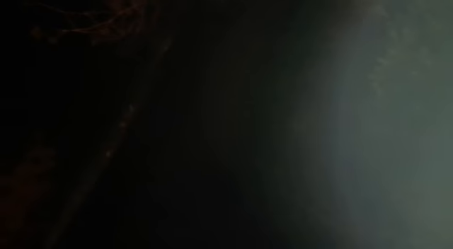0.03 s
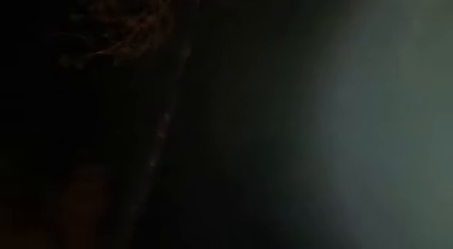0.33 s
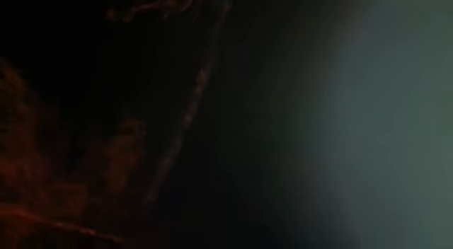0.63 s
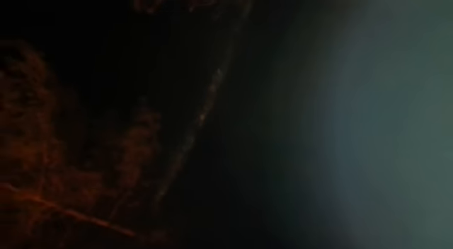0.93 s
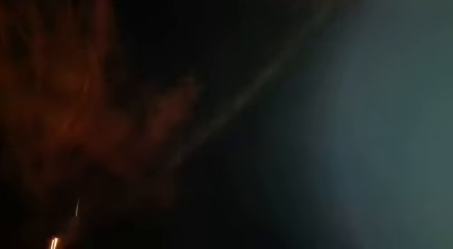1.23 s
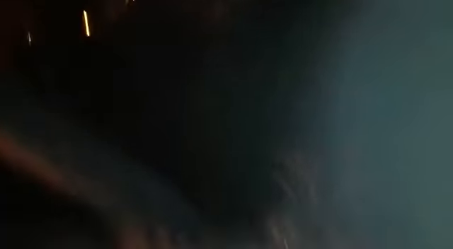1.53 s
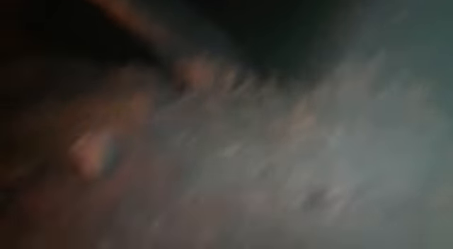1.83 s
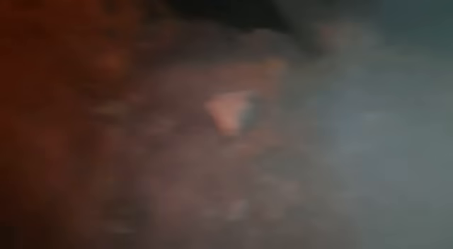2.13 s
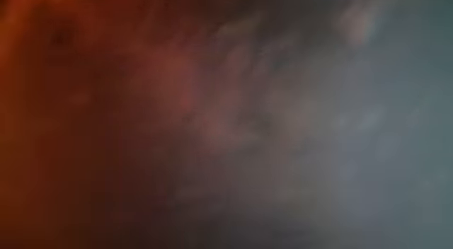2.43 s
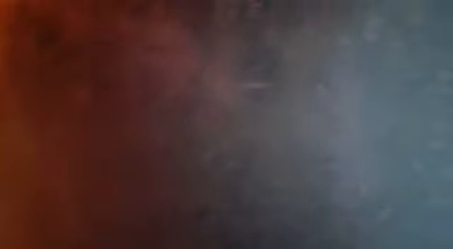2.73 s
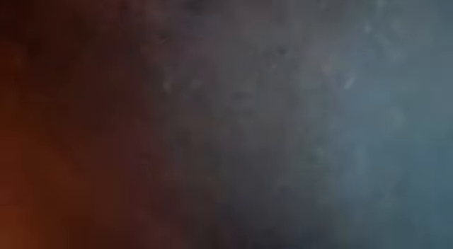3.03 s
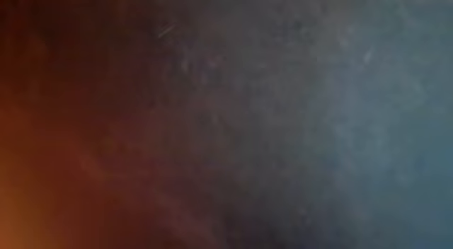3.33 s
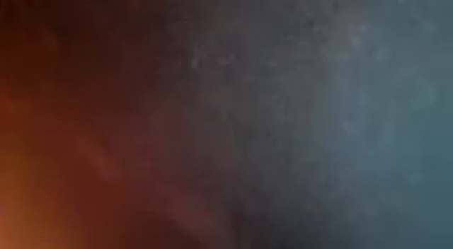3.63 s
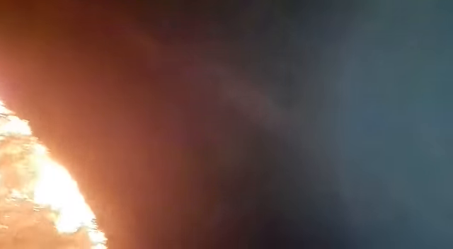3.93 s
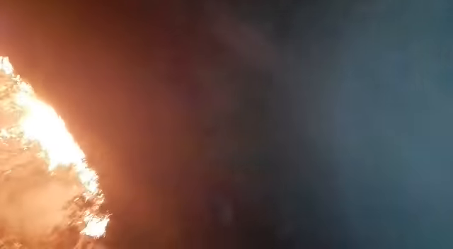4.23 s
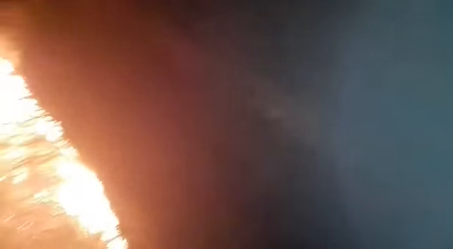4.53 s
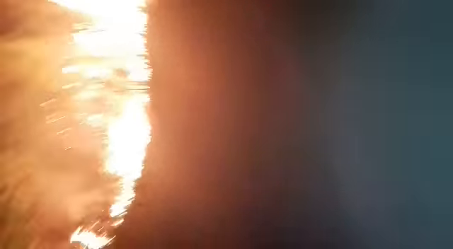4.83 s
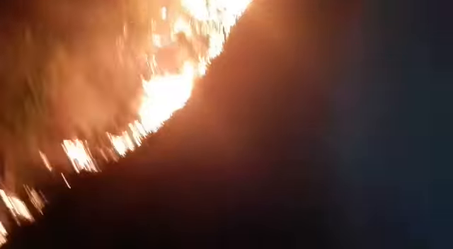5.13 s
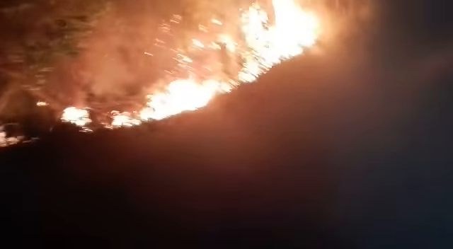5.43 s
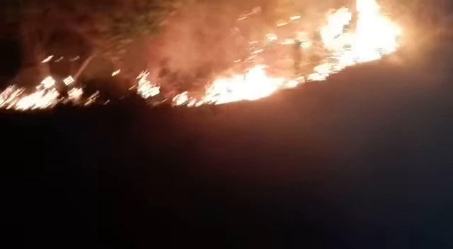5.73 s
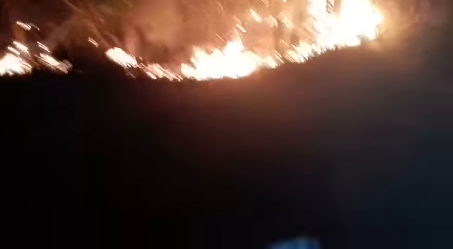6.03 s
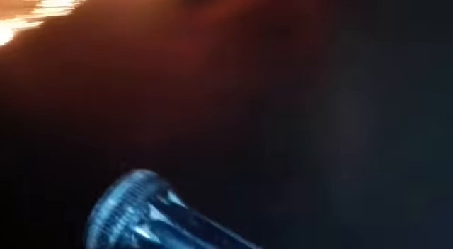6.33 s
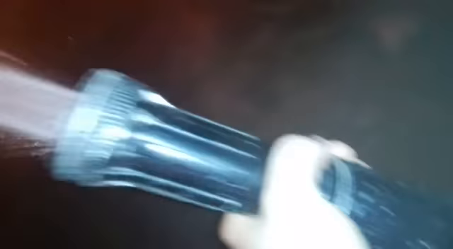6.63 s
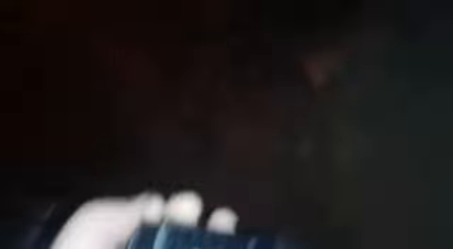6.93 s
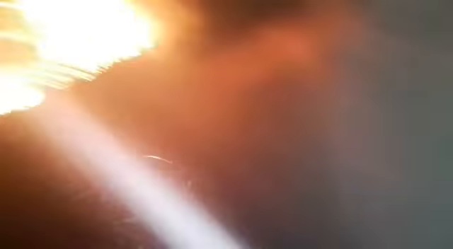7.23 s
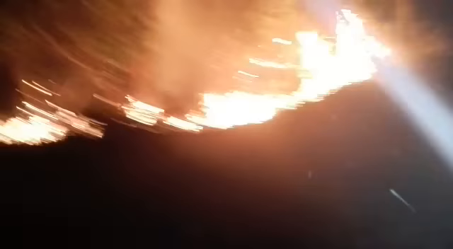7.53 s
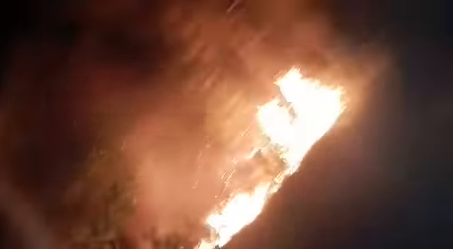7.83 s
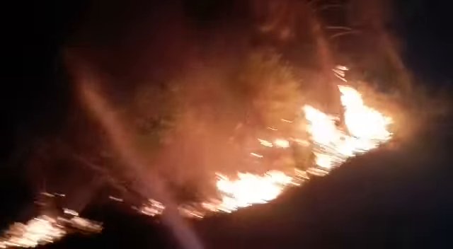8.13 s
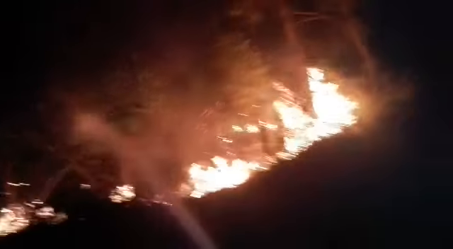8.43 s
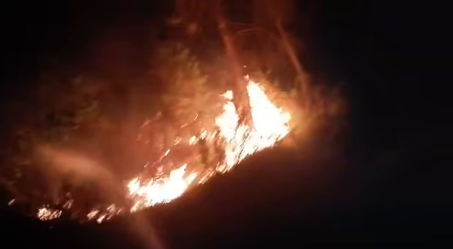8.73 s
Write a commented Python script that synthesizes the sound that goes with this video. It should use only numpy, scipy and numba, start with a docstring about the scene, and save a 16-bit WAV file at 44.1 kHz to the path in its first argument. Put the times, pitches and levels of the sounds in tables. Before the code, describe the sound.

Outdoors at a brush fire, a shut hose nozzle leaks a fine, spitting spray close to a wet phone. Drops tick and pop on the microphone, water patters on the ground, fingers rub the case and a few burning twigs snap. Then the nozzle opens with a loud, hissing burst of air and water that buffets the microphone and settles into a softer, solid stream. A distant pump engine throbs faintly throughout.

```python
"""A fire hose at a brush fire, heard from a wet phone beside the nozzle, with the pump engine throbbing behind.
At first the shut nozzle leaks a fine, spitting spray. Drops tick on the phone and pop on its two
microphone holes (the "ports"), fingers rub the case and burning twigs snap.
Then the nozzle opens: air and water burst out, beat on the ports, swing from the right to the front
and settle into a softer, solid stream."""
import sys
import numpy as np
from scipy import signal
from scipy.fft import rfft, irfft
from scipy.io import wavfile
from scipy.ndimage import uniform_filter1d, map_coordinates
from numba import njit

SR = 44100
rng = np.random.default_rng(int(sys.argv[2]) if len(sys.argv) > 2 else 0)


def waveform_to_disk(signal):
    """Save audio, clipped to [-1, 1], as 16-bit WAV at the path in sys.argv[1]."""
    frames = np.transpose(np.atleast_2d(signal))
    scaled = np.clip(frames, -1, 1) * 32767
    samples = np.round(scaled).astype(np.int16)
    wavfile.write(sys.argv[1], SR, samples)


N = 391608
TIME = np.arange(N) / SR
FREQS = np.fft.rfftfreq(N, 1 / SR)
OPEN_S, OPEN_TIME_S = 6.677, 0.016  # the valve cracks open
FULL_S, PULL_TIME_S = 6.83, 0.042  # it is pulled fully open

# "Pan" always means left level minus right level, so a positive pan lies to the left.
# The leak as the phone moves around it: t/s, spray level/dB, spray pan/dB, patter level/dB
LEAK_LEVELS = [(0, -28.3, -6.5, -38.5), (1.35, -27.4, -6, -39.5), (1.65, -26.5, -5.5, -42.5),
               (2.3, -24, -4.5, -40), (2.85, -26, -6, -39.5), (3.75, -26.5, -7.5, -41.5),
               (4.05, -26.5, -6, -48), (4.3, -27.5, -7, -49), (4.7, -25.5, -4, -36),
               (6.05, -25.5, -2, -34.5), (6.3, -26.5, -4, -34.5), (6.68, -26, -8.5, -36)]
# Sound from the ground: t/s, lowest pitch the echo weakens/Hz, echo gain/0-1, distant patter share/0-1
GROUND_ECHO = [(0, 344, 0.37, 0.77), (1.3, 343, 0.38, 1), (1.65, 312, 0.44, 0.3), (2.4, 467, 0.1, 0.26),
               (3.0, 450, 0.12, 0.18), (4.7, 507, 0.28, 0), (5.1, 390, 0.2, 0.09), (5.85, 496, 0.3, 0),
               (6.25, 640, 0.5, .1), (6.6, 716, 0.4, 0.1)]


def undb(db):
    """Turn decibels into a gain to multiply by."""
    return 10 ** (np.asarray(db) / 20)


def unit(x):
    """Scale each channel to an average (rms) level of 1."""
    return x / np.sqrt(np.mean(x ** 2, axis=-1, keepdims=True))


def stereo(db, pan_db):
    """Left and right gains for a level and a pan."""
    pair = undb(np.outer([1, -1], pan_db) / 2)
    return undb(db) * pair / np.sqrt(np.mean(pair ** 2, axis=0))


def curves(table):
    """Join the points of each column with straight lines in time."""
    times, *columns = np.transpose(table)
    return [np.interp(TIME, times, column) for column in columns]


def ramp(middle_s, length_s):
    """A straight rise from 0 to 1."""
    return np.clip((TIME - middle_s) / length_s + 0.5, 0, 1)


def swell(middle_s, length_s):
    """A rounded rise from 0 to 1 and back."""
    return np.cos(np.pi * np.clip((TIME - middle_s) / length_s, -0.5, 0.5))


def wander(rate_hz):
    """A smooth random curve of typical size 1 that heads for a new value rate_hz times a second."""
    hold = max(int(SR / rate_hz), 2)
    steps = np.repeat(rng.standard_normal(N // hold + 1), hold)[:N]
    return unit(uniform_filter1d(uniform_filter1d(steps, hold), hold))


def noise():
    """A separate white noise for each port."""
    return rng.standard_normal((2, N))


def colour(x, table):
    """Shape the tone with a table of f/Hz and gain/dB (one gain column, or one for each port)."""
    hz, *columns = np.transpose(table)
    db = np.array([np.interp(np.log(FREQS + 1), np.log(hz), column) for column in columns])
    return irfft(rfft(x) * undb(db), N)


def low_cut(x, hz):
    """Weaken everything below hz."""
    return signal.sosfilt(signal.butter(2, hz, "high", fs=SR, output="sos"), x)


@njit
def resonate(x, hz, width_hz):
    """A ringing filter (state-variable band-pass) whose pitch can change at every sample."""
    out, band_state, low_state = np.empty(len(x)), 0.0, 0.0
    for i in range(len(x)):
        tuning, damping = np.tan(np.pi * hz[i] / SR), width_hz / hz[i]
        ring = (band_state + tuning * (x[i] - low_state)) / (1 + tuning * (tuning + damping))
        band_state = 2 * ring - band_state
        low_state += 2 * tuning * ring
        out[i] = damping * ring
    return out


def band(x, hz, width_hz, passes=2):
    """Keep the sound near a steady or moving pitch; more passes give steeper edges."""
    centre_hz = hz * np.ones(x.shape[-1])
    for _ in range(passes):
        x = np.apply_along_axis(resonate, -1, x, centre_hz, float(width_hz))
    return x


def flutter(x, depth_db, rate_hz, bands=16):
    """Let overlapping pitch bands swell and sink on their own, as they do in a swirling flow."""
    position = np.sqrt(FREQS / FREQS[-1]) * (bands - 1)
    spectrum, out = rfft(x), 0
    for k in range(bands):
        part = irfft(spectrum * np.maximum(1 - np.abs(position - k), 0), N)
        out = out + part * undb(depth_db * wander(rate_hz))
    return out


def grains(per_s, spread_db, decay_s, floor):
    """Loudness curve of many tiny hits, such as drops: uneven, quick to fade, over an even floor."""
    hits = rng.random(N) < per_s / SR
    size = undb(spread_db * np.minimum(rng.standard_normal(N), 2.5))
    power = signal.lfilter([1], [1, -np.exp(-1 / (decay_s * SR))], hits * size ** 2)
    return unit(np.sqrt(power / power.mean() + floor))


def strikes(table, shape):
    """Place a fresh pulse for each row of t/s, peak/dB, pan/dB; any further columns go to shape."""
    out, t = np.zeros((2, N + SR)), np.arange(SR // 20) / SR
    for start_s, db, pan_db, *more in table:
        pulse, start = shape(t, *more), int(start_s * SR)
        pulse = pulse / np.abs(pulse).max(axis=-1, keepdims=True)
        out[:, start:start + len(t)] += stereo(db, pan_db) * pulse
    return out[:, :N]


def water_noise(shared, top_hz):
    """Noise whose shared part, fading above top_hz, comes straight from the water to one port first."""
    # Direction of the water as the phone turns: t/s, delay of the left port behind the right/ms
    bearing = [(0, .15), (1, .16), (1.5, .32), (1.9, .4), (2.3, .37), (2.7, .24), (3.2, .24), (4.5, .17),
               (5.1, .02), (5.7, -.02), (6.1, .03), (6.5, .22), (7.05, .36), (7.25, .27), (7.45, -.12),
               (7.62, -.25), (7.9, 0), (8.15, -.11), (8.88, -.13)]
    lag_ms, = curves(bearing)
    right = rng.standard_normal(N)
    left = map_coordinates(right, [(TIME - lag_ms / 1000) * SR], mode="mirror")
    share = shared / (1 + (FREQS / top_hz) ** 4)
    return irfft(np.sqrt(share) * rfft(np.array([left, right])) + np.sqrt(1 - share) * rfft(noise()), N)


def off_ground(x, echo, notch_hz):
    """Add the echo off the ground, which arrives half a cycle late at notch_hz and weakens that pitch."""
    delay_s = 0.5 / notch_hz
    return x + echo * np.array([np.interp(TIME - delay_s, TIME, channel) for channel in x])


def pump_engine():
    """The pump runs steadily far off: only its low tones and a rumble arrive, wavering in the air."""
    # Engine tones: multiple of the four-stroke cycle rate, relative level/dB
    engine_tones = [(1, -33), (2, -29), (3, -21), (4, -3), (5, 1.5), (6, -3.5), (7, -9.5), (8, -1),
                    (9, -11), (10, -20), (11, -20), (12, -25), (13, -25), (14, -16.5)]
    # Engine rumble and outdoor air: f/Hz, gain/dB
    rumble_colour = [(20, -29), (35, -16), (60, -6), (100, -2), (150, -9), (240, -12.5), (340, -12),
                     (480, -15.5), (3000, -30.5)]
    cycle_hz, waver_db = 15.5, 1.5
    phase = 2 * np.pi * np.cumsum(cycle_hz * (1 + 0.0024 * wander(2.746))) / SR
    throb = sum(undb(db + waver_db * wander(8.5)) * np.sin(multiple * phase + 2 * np.pi * rng.random())
                for multiple, db in engine_tones)
    notch_hz, echo, _ = curves(GROUND_ECHO)
    air = off_ground(rng.standard_normal(N) + 0.5 * noise(), echo, notch_hz)
    return undb(-41.5) * unit(throb) + undb(-43) * unit(colour(air, rumble_colour))


def twig_snaps():
    """Burning twigs crack, each at its own pitch, far enough off that both ports get the same shape."""
    # Twigs breaking: t/s, peak/dB, pan/dB
    snaps = [(5.497, -22, 5), (5.7962, -22, 6), (5.8088, -14.5, 7), (6.1796, -24, 6), (6.2872, -18, 5)]

    def snap(t):
        hz = 2800 * np.exp(rng.uniform(-0.25, 0.25))
        crack = rng.standard_normal(len(t)) * np.exp(-t / 0.0013)
        return low_cut(band(crack, hz, width_hz=2400, passes=1), 1800)
    return strikes(snaps, snap)


def hand_bumps():
    """The hand knocks softly on the phone; each thud dies within about two cycles."""
    # Dull knocks: t/s, peak/dB, pan/dB
    bumps = [(0.096, -23, 8), (0.126, -23.5, 3), (0.152, -23, 18), (0.183, -19.5, 20), (0.385, -20, 20),
             (0.409, -29, 10), (0.424, -25, 15), (1.408, -27, 20)]

    def bump(t):
        hz = 115 * np.exp(0.18 * rng.standard_normal())
        return np.sin(2 * np.pi * hz * t) * t * np.exp(-t / 0.003)
    return strikes(bumps, bump)


def finger_clicks():
    """A fingertip sticks beside the left port and lets go with a muffled click."""
    # Skin letting go of the case: t/s, peak/dB, pan/dB
    clicks = [(4.8438, -20, 23), (4.8572, -19.5, 21), (4.901, -20, 20), (4.9044, -18.5, 20),
              (4.9123, -20, 22), (4.9193, -22.5, 20)]

    def click(t):
        hz = 620 * np.exp(rng.uniform(-0.2, 0.2))
        ring = np.cos(2 * np.pi * hz * t) * np.exp(-t / 0.0007)
        return signal.sosfilt(signal.butter(4, 1500, fs=SR, output="sos"), ring)
    return strikes(clicks, click)


def finger_rubs():
    """Fingers rub the phone and the valve handle: short swells of tiny slips around one broad pitch."""
    # Rubs: middle t/s, length/s, level/dB, centre f/Hz, width/Hz, pan/dB
    rubs = [(0.157, 0.44, -36.5, 135, 49.7, 25), (0.488, 0.28, -38.5, 102, 39.5, 17),
            (4.722, 0.12, -42.5, 1060, 500, 22), (4.904, 0.03, -30, 200, 70, 14),
            (4.91, 0.1, -37, 650, 400, 25), (4.96, 0.07, -38, 1160, 350, 18),
            (6.655, 0.099, -35, 1440, 830, 14)]
    out, slips = 0, grains(per_s=780, spread_db=2, decay_s=0.0013, floor=0.56)
    for middle_s, length_s, db, hz, width_hz, pan_db in rubs:
        scrape = band(rng.standard_normal(N) * slips, hz, 2 * width_hz)
        out = out + unit(scrape) * swell(middle_s, length_s) * stereo(db, pan_db)
    return out


def case_ticks():
    """Large drops ring the phone's case for an instant and shatter in a short, bright crack."""
    # Drops on the case: t/s, peak/dB, pan/dB, f/Hz
    ticks = [(0.381, -13, -8, 8400), (0.386, -13, -4, 7200), (0.4472, -13, -13, 8400),
             (0.5117, -13, -11, 7200), (0.5526, -11.5, -13, 8400), (0.6681, -12, -8, 8000),
             (1.0234, -15, -10, 7300), (1.1116, -12.5, -10, 8000), (1.1171, -10, -13, 8500),
             (1.1698, -12, -10, 7300), (1.1939, -11, -11, 8200), (1.2893, -12, -9, 8300),
             (1.3868, -9, -14, 8200), (1.6021, -10, -9, 8500), (1.7005, -10, -15, 8200),
             (1.7876, -6.5, -10, 7800), (1.9424, -11.5, -6, 7500), (1.948, -11, -5, 7500),
             (2.0651, -11, 0, 8000), (2.112, -9.5, -6, 8400), (2.1964, -4, -4, 8200),
             (2.2059, -7, -5, 7900), (2.2309, -10, -7, 8000), (2.2427, -7, -4, 7700),
             (2.2925, -8, -7, 7700), (2.4159, -8, -9, 7800), (2.5969, -6, -10, 7700),
             (2.6206, -4.5, -6, 7100), (2.6322, -6.5, -10, 8200), (2.6668, -12, -8, 8300),
             (2.6715, -9, -5, 9300), (2.7122, -13, -1, 6900), (2.7194, -9.5, -4, 7000),
             (2.9024, -8.5, -10, 8400), (3.0314, -12, -10, 7100), (3.0443, -10, -9, 6900),
             (3.1672, -11, -10, 7600), (3.1966, -8.5, -7, 7600), (3.206, -8.5, -15, 9400),
             (3.4324, -11, -10, 7500), (4.0103, -8, 0, 7300), (4.0857, -9.5, -8, 7200),
             (4.2652, -9, -10, 9200), (4.6297, -8, -13, 8300), (4.7414, -8, -3, 8300),
             (4.9511, -11, -1, 7100), (4.9651, -6.5, -5, 7100), (5.1215, -8, -7, 7100),
             (5.1849, -9, -5, 7500), (5.2336, -5.5, -8, 7800), (5.5047, -11, 1, 7300),
             (5.6023, -7.5, -3, 7000), (5.7068, -7, -1, 9000), (5.9224, -11, -4, 7600),
             (6.0046, -10.5, -6, 8500), (6.0475, -10.5, -5, 7400), (6.0813, -7, -2, 7900),
             (6.6567, -7, -14, 8200)]

    def tick(t, hz):
        shatter = rng.standard_normal((2, len(t))) * np.exp(-t / 0.0009)
        crack = band(shatter, hz, width_hz=7500, passes=1)
        ring = np.cos(2 * np.pi * hz * t) * np.exp(-t / 0.0002)
        return low_cut(crack + 1.2 * ring, 3800)
    return strikes(ticks, tick)


def port_pops():
    """A drop on the right port gives the air inside one sharp push and leaves a faint splash."""
    # Drops on the port: t/s, peak/dB, pan/dB
    pops = [(0.698, -23, -18), (0.7206, -10.5, -22), (0.7324, -18, -15), (0.8404, -13.5, -16),
            (2.0648, -20, -12), (2.3608, -19, -12), (2.4156, -12, -22), (2.4487, -18, -15),
            (4.0101, -19, -11), (4.0556, -15, -15)]

    def pop(t):
        push = np.cos(2 * np.pi * 450 * t) * np.exp(-t / 0.00019)
        splash = rng.standard_normal(len(t)) * np.exp(-t / 0.004)
        return push + 0.05 * band(splash, hz=2000, width_hz=4000, passes=1)
    return strikes(pops, pop)


def ground_patter():
    """The leaked water lands on the ground: separate splashes nearby, a duller wash farther off."""
    # Water landing nearby: f/Hz, gain/dB
    near_colour = [(100, -43), (300, -2.5), (700, -5), (1400, -40), (2300, 1.5), (4000, 2.5), (7000, -1),
                   (14000, -6)]
    # Water landing far off: f/Hz, gain/dB
    far_colour = [(100, -22), (300, -27), (680, -1), (1000, 5), (1350, 4), (2200, 0.5), (2900, -15),
                  (8000, -31)]
    notch_hz, echo, far_share = curves(GROUND_ECHO)
    _, _, db = curves(LEAK_LEVELS)
    splashes = water_noise(shared=0.41, top_hz=7000)
    splashes *= grains(per_s=910, spread_db=9.5, decay_s=0.0039, floor=0.47)
    near = np.sqrt(1 - far_share) * unit(colour(splashes, near_colour))
    far = np.sqrt(far_share) * unit(colour(noise() + rng.standard_normal(N), far_colour))
    patter = off_ground(near + 0.48 * far, echo, notch_hz)
    return unit(flutter(patter, depth_db=1.5, rate_hz=14)) * stereo(db, pan_db=2.7)


def wet_port(spray, shower):
    """A water film shifts the left port's ring as the phone tilts, and dulls the octave above it."""
    # Ring of the wet port: t/s, f/Hz, level/dB
    port_ring = [(0, 4530, -38), (1.3, 4230, -43.5), (1.7, 6100, -42), (2.3, 6200, -36.5), (2.9, 5500, -45),
                 (3.4, 5300, -35.5), (4.6, 4960, -36), (5.2, 7040, -47), (6.7, 5500, -58)]
    hz, db = curves(port_ring)
    hz = hz * np.exp(0.055 * wander(25))
    wetting = grains(per_s=520, spread_db=6, decay_s=0.00067, floor=1.5)
    ring = band(shower * wetting, hz, width_hz=0.32 * hz.mean())
    lost_treble = 0.35 * undb(db - db.max()) * band(spray, 2 * hz, width_hz=3600, passes=1)
    return spray - lost_treble + unit(ring) * undb(db)


def leak():
    """Spray spits unevenly from the shut nozzle; both ports hear the same drops, each in its own tone."""
    # Strongest spurts and lulls: middle t/s, length/s, gain/dB
    spurts = [(0.69, 0.043, 2.5), (1.35, 0.04, -5), (1.61, 0.11, 3.5), (2.25, 0.62, 0.5), (2.56, 0.038, 3),
              (2.66, 0.099, -3.5), (3.19, 0.061, 2.5), (3.61, 0.067, 1.5), (4.06, 0.34, 1),
              (4.65, 0.069, 2.5), (6.06, .08, 1.5)]
    # Tone of the spray: f/Hz, left gain/dB, right gain/dB
    spray_colour = [(100, -30, -30), (300, -17, -14), (506, 0, 3.5), (910, -5, -2), (1320, -3, -8.5),
                    (1820, -7, -11.5), (3470, -13.5, -14), (4070, -8.5, -11), (6150, -8.5, -5.5),
                    (7740, -6, 0.5), (8950, -10, -2.5), (11530, -12.5, -10), (14200, -12.5, -12)]
    db, pan_db, _ = curves(LEAK_LEVELS)
    db = db + sum(gain_db * swell(middle_s, length_s) for middle_s, length_s, gain_db in spurts)
    flicker = undb(0.5 * wander(20) + 0.65 * wander(110))
    fine = grains(per_s=2200, spread_db=2.5, decay_s=0.00081, floor=0.62)
    coarse = grains(per_s=130, spread_db=2, decay_s=0.0003, floor=0)
    coarse *= undb(db - db.mean())  # the closer the spray, the more its big drops stand out
    shower = water_noise(shared=0.36, top_hz=8500) * flicker * np.hypot(fine, 0.22 * coarse)
    spray = flutter(colour(shower, spray_colour), depth_db=1.13, rate_hz=35)
    left, right = unit(low_cut(spray, 2580)) * stereo(db, pan_db)
    return np.array([wet_port(left, shower[0]), right])


def splatter():
    """Lumps of water from the jet break up on the slope, in a sputter whose tone keeps shifting."""
    # The jet landing: t/s, level/dB, pan/dB
    landing = [(6.8, -36, 0), (6.9, -23.5, 1), (7.1, -23.5, 3), (7.25, -30, 3), (7.48, -25, -3),
               (7.7, -24, -2), (8.0, -29, -3), (8.15, -26, 0), (8.88, -26, 1)]
    hz = 4500 * np.exp(0.16 * wander(22))
    lumps = undb(2.5 * wander(40)) * grains(per_s=500, spread_db=4, decay_s=0.0015, floor=0.5)
    sputter = lumps * water_noise(shared=0.42, top_hz=8000)
    return unit(band(sputter, hz, width_hz=3600)) * stereo(*curves(landing))


def buffeting(db, pan_db, solid):
    """Spray and the air it drags along beat on each port, steadily and in gusts; the stream then roars."""
    # Gusts that hit a port: middle t/s, length/s, level/dB, pan/dB
    gusts = [(6.842, 0.093, -20, -5), (6.94, 0.11, -28.5, 14), (7.41, 0.09, -24.5, 11),
             (7.584, 0.3, -20, 19), (7.76, 0.094, -21, 6)]
    # Tone of the beating and the roar: f/Hz, gain/dB
    buffet_colour = [(20, -39), (60, -5), (140, 1), (400, 0), (900, -2), (1500, -2.5), (3000, -26)]
    steady = np.sqrt(1 - solid) * stereo(db - 13.5, 2.5 * pan_db)  # leans to the side of the jet
    gust_power = sum((swell(middle_s, length_s) * stereo(gust_db, side_db)) ** 2
                     for middle_s, length_s, gust_db, side_db in gusts)
    blows = noise() * grains(per_s=880, spread_db=0.5, decay_s=0.0014, floor=0.8)
    beating = unit(colour(blows, buffet_colour)) * np.sqrt(steady ** 2 + gust_power)
    # the roar is much alike at both ports
    roar = off_ground(water_noise(shared=0.8, top_hz=6000), echo=0.25, notch_hz=577)
    roar = low_cut(unit(colour(roar, buffet_colour)), 130)
    return beating + roar * np.sqrt(solid) * stereo(db - 15, pan_db)


def air_spits():
    """Each pocket of air leaves the nozzle as a short, bright spit."""
    # Air pockets: middle t/s, length/s, level/dB, pan/dB
    pockets = [(6.874, .06, -17, -5), (7.56, .05, -10, -12), (7.795, 0.44, -17, -9)]
    spit_colour = [(3000, -37), (5500, -19), (6900, -1), (8500, -10), (14000, -5)]  # f/Hz, gain/dB
    gain = sum(swell(middle_s, length_s) * stereo(db, pan_db) for middle_s, length_s, db, pan_db in pockets)
    return gain * unit(colour(noise(), spit_colour))


def gargle_and_fizz(db):
    """Air torn through the water rattles inside the nozzle and blows off a fizzing mist."""
    fizz_colour = [(9000, -46), (11800, 2), (13200, 8), (14200, -7)]  # f/Hz, gain/dB
    rattle = water_noise(shared=0.5, top_hz=7000) * grains(per_s=650, spread_db=5, decay_s=0.001, floor=1)
    ring_hz = 2300 + 1000 * ramp(8.35, 0.46)  # rises as the last bubbles clear
    gargle = unit(band(rattle, ring_hz * (1 + 0.1 * wander(17)), width_hz=1050))
    gargle *= ramp(FULL_S, PULL_TIME_S)
    gargle_db = db - 15.5 + 1.5 * swell(7.02, 0.68)  # swells as the main pocket of air passes
    fizz = unit(colour(rattle, fizz_colour))
    fizz_db = db - 17 + 11 * swell(7.56, 0.71)  # one long puff
    return gargle * stereo(gargle_db, pan_db=1.2) + fizz * stereo(fizz_db, pan_db=2.9)


def nozzle_hiss(db):
    """The sharp hiss of the open nozzle; its pitch falls with the pressure."""
    start_hz, fall_hz_per_s = 9050, 390
    hz = (start_hz - fall_hz_per_s * np.maximum(TIME - OPEN_S, 0)) * (1 + 0.03 * wander(35))
    hiss = unit(band(noise(), hz, width_hz=3000))
    hiss_db = db - 12.5 + 8 * swell(7.37, 0.34)  # swells as the jet passes the phone
    return hiss * stereo(hiss_db + 1.8 * wander(30), pan_db=-1)


def jet_state():
    """The jet's level/dB, pan/dB and share of solid stream/0-1 as the air is driven out of the hose."""
    # Surges and lulls of the jet: middle t/s, length/s, gain/dB
    surges = [(6.865, .05, 2), (7.1, 0.12, 1), (7.48, 0.15, -2), (7.56, 0.093, 1.5), (8.03, 0.13, -1.5)]
    air_gone_s, half_open_db = 7.89, -4
    burst_fall_db_per_s, stream_fall_db_per_s = 7.5, 2.5
    solid = ramp(air_gone_s, 0.59)
    burst_db = -5.5 + half_open_db * (1 - ramp(FULL_S, PULL_TIME_S))
    burst_db -= burst_fall_db_per_s * np.maximum(TIME - FULL_S, 0)
    stream_db = -15 - stream_fall_db_per_s * (TIME - air_gone_s)
    surge_db = sum(gain_db * swell(middle_s, length_s) for middle_s, length_s, gain_db in surges)
    db = (1 - solid) * burst_db + solid * stream_db + surge_db
    pan_db = -4.5 + 6 * ramp(7.44, 0.22)  # swings from the right to the front
    return db, pan_db, solid


def jet(db, pan_db, solid):
    """The open nozzle spits air and water with a sharp hiss, then runs as a solid, duller stream."""
    # The jet while air still spits with it: f/Hz, left gain/dB, right gain/dB
    burst_colour = [(30, -25, -25), (120, -17, -3), (350, -3, 3.5), (800, -12.5, -13), (1400, -9, -8),
                    (2130, -4, -7.5), (2900, -7, -7.5), (4600, -8.5, -8), (6240, -7, -7.5), (7700, -5, 0),
                    (9100, -1, 3), (9900, -8.5, -3.5), (11200, -8.5, -7.5), (14300, -7, -7)]
    # The jet as a solid stream: f/Hz, left gain/dB, right gain/dB
    stream_colour = [(30, -22, -22), (150, -8, -11), (500, -9, -10), (1290, -6.5, -12.5), (2340, 2, -2),
                     (3300, -6, -3), (4000, 2, -2), (4640, -4, -7.5), (6400, -4, -0.5), (8150, -13, 3),
                     (9700, -15, -4), (11500, -10.5, -3.5), (14000, -2, -6.5), (14200, -6.5, -8.5)]
    stream_share = 0.075 + 0.85 * solid  # a little of each sound is always there
    burst_gain, stream_gain = np.sqrt(1 - stream_share), np.sqrt(stream_share)
    churn = undb(0.66 * wander(45)) * grains(per_s=2500, spread_db=3, decay_s=0.0012, floor=0.88)
    burst = unit(colour(water_noise(shared=0.33, top_hz=13000), burst_colour))
    stream = unit(colour(water_noise(shared=0.64, top_hz=6070), stream_colour))
    rush = flutter(burst_gain * burst + stream_gain * stream, depth_db=2, rate_hz=24, bands=24)
    rush = low_cut(rush, 650) * stereo(db, pan_db)
    return churn * (rush + burst_gain * nozzle_hiss(db))


def scene():
    """The leak gives way to the jet as the valve opens; the pump runs throughout."""
    valve = np.clip((TIME - OPEN_S) / OPEN_TIME_S, 0, 1)
    db, pan_db, solid = jet_state()
    flow = jet(db, pan_db, solid) + gargle_and_fizz(db) + air_spits()
    flow += splatter() + buffeting(db, pan_db, solid)
    water = (1 - valve) * (leak() + ground_patter()) + valve * flow
    drops = case_ticks() + port_pops()
    hands = hand_bumps() + finger_clicks() + finger_rubs()
    return water + drops + hands + twig_snaps() + pump_engine()


def record(dry):
    """The phone rounds off the loudest peaks and cuts the highest treble."""
    ceiling, top_hz = 0.97, 14300
    rounded = dry / (1 + (dry / ceiling) ** 6) ** (1 / 6)
    return signal.sosfilt(signal.ellip(12, 0.2, 70, top_hz, fs=SR, output="sos"), rounded)


dry = scene()
out = record(dry)
waveform_to_disk(out)
```